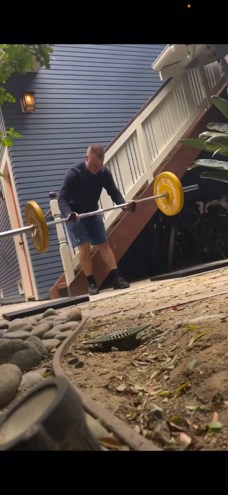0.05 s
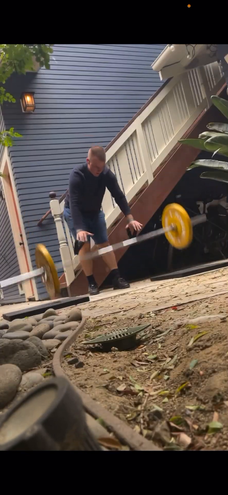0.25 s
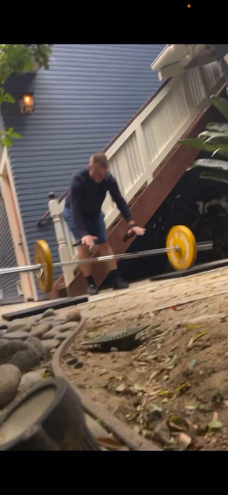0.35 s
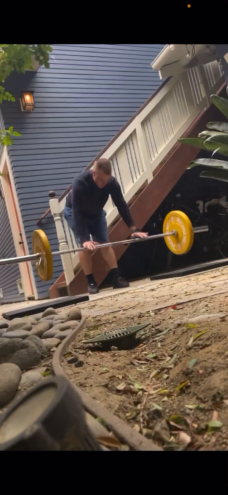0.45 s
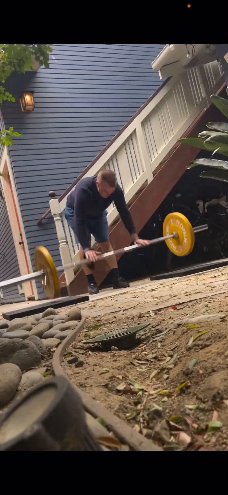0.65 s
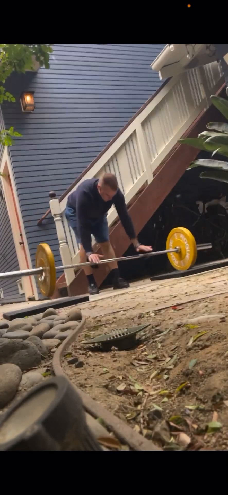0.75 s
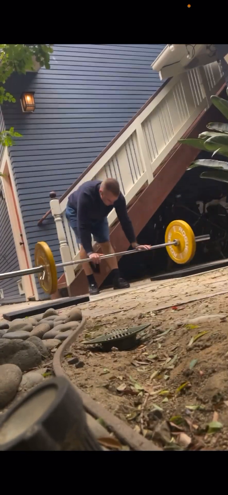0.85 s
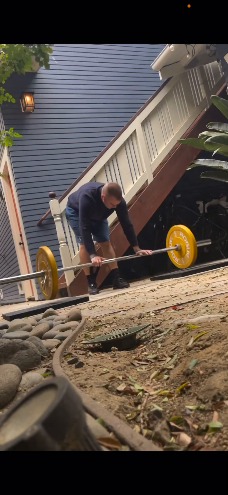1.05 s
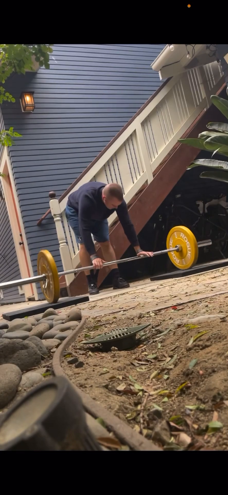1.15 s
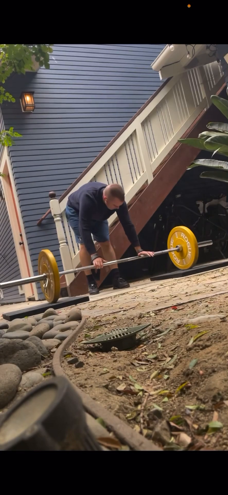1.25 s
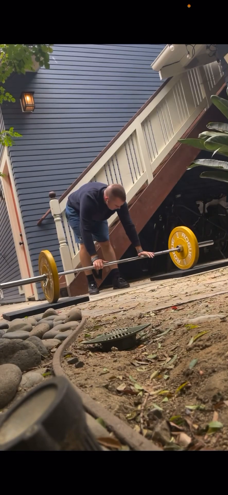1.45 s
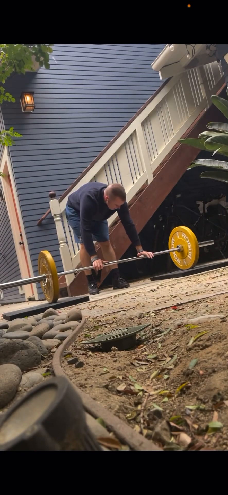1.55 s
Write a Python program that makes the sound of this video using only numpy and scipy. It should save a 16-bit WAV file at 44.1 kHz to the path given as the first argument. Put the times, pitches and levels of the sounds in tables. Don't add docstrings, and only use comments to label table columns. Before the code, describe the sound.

A loaded barbell drops on hard ground with a heavy thud, rattling through smaller bounces outdoors

```python
import sys
import numpy as np
from scipy import signal
from scipy.fft import rfft, irfft
from scipy.io import wavfile

SR = 44100
rng = np.random.default_rng(int(sys.argv[2]) if len(sys.argv) > 2 else 0)


def voltage_ratio(decibels):
    exponent = np.asarray(decibels, float) / 20
    return 10 ** exponent


def to_wav(s):
    ch = np.atleast_2d(s).T
    pcm = np.round(np.clip(ch, -1, 1) * 32767)
    wavfile.write(sys.argv[1], SR, pcm.astype(np.int16))


N = 70560

# frequency in Hz, density in dB per Hz.
YARD_SPECTRUM = [(15, -27.5), (25, -7), (65, 3.5), (431, -18.5), (477, -22.5), (1200, -36), (2610, -35),
                 (2880, -31.5), (9800, -66), (12700, -92), (21600, -120)]
# time in seconds, level in dB.
YARD_FADE = [(0, 6.5), (.09, -3.5), (0.202, -1), (1.301, 6), (1.6, -6.5)]
YARD_DB = -37.5
WHINE_HZ, WHINE_WIDTH_HZ, WHINE_DB = 679, 110, -21

# start in seconds, rms level in dB, hold in seconds,
# fade in dB per second, treble level in dB.
SHAKES = [(0, -61, .02, 87, 3), (0.253, -17.5, 0.036, 406, -0.5), (0.305, -17.5, .04, 154, -0.5),
          (.48, -37.5, 0.0094, 118.5, 0.5), (0.651, -25.5, 0.034, 270.5, -4),
          (0.689, -26, 0.091, 182.5, -1), (.932, -30.5, 0.045, 251, -3.5), (1.001, -32, 0.02, 271, -4),
          (1.064, -31, 0.014, 507, -9.5), (1.115, -29.5, 0.03, 287, -6.5), (1.161, -32.5, 0.013, 296, 0),
          (1.258, -37.5, 0.0066, 355, -7), (1.333, -39.5, 0.0067, 266, -3.5)]
# frequency in Hz, bandwidth in Hz, level in dB.
STEEL_MODES = [(1165, 127, 6), (1499, 20, 12.5), (1807, 34, 6.5), (2111, 32, 6.5), (2523, 55, -0.5),
               (2966, 78, -2), (3476, 20, 3), (3870, 74, 2.5), (4300, 36, -1.5), (5100, 27, 7),
               (5200, 73, -24.5), (5800, 18, -35), (6300, 92, -19), (7200, 390, -19.5)]
# frequency in Hz, density in dB per Hz.
CLATTER = [(350, -21.5), (600, -1.5), (1110, 0.5), (1660, -21.5), (1780, -2.5), (3230, -7.5), (5210, -5.5),
           (7850, -12.5), (9800, -26.5), (12700, -30.5), (21600, -120)]
# frequency in Hz, density in dB per Hz.
THUD = [(18, -40.5), (30, -3), (65, -1), (178, -9), (322, -15.5), (353, -12.5), (700, -24.5), (910, -31),
        (1540, -120)]
SHAKE_RISE_S, TREBLE_HZ = 0.003, 2880
KNOCKS_PER_S, KNOCK_SPREAD_DB = 400, 3.76
RING_DB, CHIP_DB, HISS_DB, THUD_DB = -2.5, -7.5, -2, 5.5
CHIP_WIDTH = 0.13

# start in seconds, level in dB, pitch in Hz.
BOOMS = [(.01, -48, 73), (0.058, -27.5, 72.8), (0.224, -26.5, 81), (.26, -7.5, 73.8), (.313, -5, 55.7),
         (0.355, -5, 61.8), (0.446, -14.5, 62), (.575, -26, 58), (0.653, -20, 63), (0.702, -21, 67.3),
         (.731, -10, 60.2), (0.768, -7.5, 61.8), (0.858, -18.5, 61.5), (0.928, -35.5, 62), (.995, -15, 61),
         (1.026, -15.5, 62), (1.121, -38, 56.4), (1.151, -20.5, 55), (1.186, -23, 58), (1.252, -23.5, 63.3),
         (1.318, -37, 61.2)]
BOOM_RISE_S, BOOM_FALL_S, BOOM_OVERTONE_DB = 0.007, 0.021, -13.5

# start in seconds, level of lower rings in dB, level of upper rings in dB.
CLINKS = [(.122, -46, -52), (.262, -12, -17), (.281, -11, -15), (.291, -13, -22), (.3155, -11, -9),
          (.322, -13, -22), (.333, -13, -20), (.348, -11, -22), (.379, -15, -24), (.485, -30, -26),
          (.515, -32, -29), (.59, -34, -36), (.661, -20, -24), (.693, -26, -21), (.704, -18, -17),
          (.732, -26, -21), (.756, -21, -20), (.769, -20, -30), (.779, -18, -25), (.795, -30, -24),
          (.915, -37, -36), (.937, -32, -22), (.947, -25, -28), (.96, -23, -19), (1.016, -36, -28),
          (1.133, -32, -26), (1.164, -26, -36), (1.293, -50, -40), (1.3278, -26, -26), (1.388, -44, -45)]
# frequency in Hz, bandwidth in Hz, level in dB.
COLLAR_MODES = [(2050, 500, -10), (3900, 500, -9), (5200, 450, 0), (6500, 700, -9), (7600, 550, 0),
                (8400, 700, -9)]
CLINK_S, CLINK_VARY_DB = 0.0012, 2.5
UPPER_HZ, UPPER_DB, LOWER_DB = 6000, -1, -1

# start in seconds, level in dB, pitch in Hz.
NEAR_LANDINGS = [
    (0.2472, 0, 388),
    (0.6449, -4.5, 370.4),
    (0.9196, -8.5, 370),
    (1.1058, -12, 360),
]
# start in seconds, level in dB, pitch in Hz.
FAR_LANDINGS = [(.306, -1, 320), (.318, -7.5, 310), (.327, -9, 446), (.338, -8.5, 330), (0.345, -19.5, 348),
                (0.722, -10.5, 333), (.735, -14, 310), (0.955, -14, 288), (.978, -10, 335),
                (0.991, -12, 310), (0.9266, -15, 326), (1.112, -14, 262), (1.123, -19, 236),
                (1.136, -18, 234), (1.151, -20, 278), (1.2347, -15.5, 311), (1.244, -23, 258),
                (1.251, -20.5, 217), (1.29, -27, 270), (1.349, -24.5, 241)]
NEAR_RISE_S, NEAR_LOW, NEAR_GLIDE = 0.0026, 0.5, 1.4
FAR_RISE_S, FAR_LOW, FAR_GLIDE = 0.0031, 0.768, 0.5
GLIDE_S = 0.0032
TICK_RISE_S, TICK_S, TICK_DB = 0.00089, 0.0038, -28.5

# frequency in Hz, time to decay 60 dB in seconds.
WALLS = [(60, .3), (300, 0.47), (1500, 0.36), (5000, 0.45), (9000, 0.33)]
WALL_DB = -11.5

BASS_CUT_HZ, LIMIT, EDGE_HZ = 38, 1.04, 9800


def evened(x):
    return x / np.sqrt(np.mean(x ** 2) + 1e-20)


def read(points, hz):
    f, value = np.transpose(points)
    return np.interp(np.log(hz + 1), np.log(f + 1), value)


def add(mix, s, sound):
    part = mix[max(round(s * SR), 0):][:len(sound)]
    part += sound[:len(part)]


def colour(x, points):
    hz = np.fft.rfftfreq(len(x), 1 / SR)
    inside = (hz > 0.7 * points[0][0]) & (hz < 1.3 * points[-1][0])
    return evened(irfft(rfft(x) * voltage_ratio(read(points, hz)) * inside, len(x)))


def resonate(x, hz, width):
    r = np.exp(-np.pi * width / SR)
    return signal.lfilter([1 - r, 0, r - 1], [1, -2 * r * np.cos(2 * np.pi * hz / SR), r * r], x)


def swell(t, rise, fall):
    shape = (1 - np.exp(-t / rise)) ** 2 * np.exp(-t / fall)
    return shape / shape.max()


def yard():
    s, db = np.transpose(YARD_FADE)
    level = voltage_ratio(YARD_DB + np.interp(np.arange(N) / SR, s, db))
    rumble = colour(rng.standard_normal(N), YARD_SPECTRUM)
    whine = evened(resonate(rng.standard_normal(N), WHINE_HZ, WHINE_WIDTH_HZ))
    return level * (rumble + voltage_ratio(WHINE_DB) * whine)


def knocks():
    size = voltage_ratio(KNOCK_SPREAD_DB * np.minimum(rng.exponential(1, N), 3))
    struck = rng.random(N) < KNOCKS_PER_S / SR
    return evened(size * struck * rng.choice([-1., 1.], N))


def shake_power():
    t, low, high = np.arange(N) / SR, np.zeros(N), np.zeros(N)
    for s, db, hold, fade_db, treble_db in SHAKES:
        u = np.maximum(t - s, 0)
        rise = np.minimum(u / SHAKE_RISE_S, 1)
        power = (rise * voltage_ratio(db - fade_db * np.maximum(u - hold, 0))) ** 2
        low += power
        high += power * voltage_ratio(2 * treble_db)
    return low, high


def rattle():
    low, high = shake_power()
    ring, chips = np.zeros(N), np.zeros(N)
    for hz, width, db in STEEL_MODES:
        train = knocks()
        ring += voltage_ratio(db) * resonate(train, hz, width)
        chip = resonate(resonate(train, hz, CHIP_WIDTH * hz), hz, 2 * CHIP_WIDTH * hz)
        chips += voltage_ratio(read(CLATTER, hz)) * chip
    hiss = colour(rng.standard_normal(N), CLATTER)
    steel = voltage_ratio(RING_DB) * evened(ring) + voltage_ratio(CHIP_DB) * evened(chips) + voltage_ratio(HISS_DB) * hiss
    dull = signal.sosfiltfilt(signal.butter(2, TREBLE_HZ, fs=SR, output="sos"), steel)
    thud = colour(rng.standard_normal(N), THUD)
    return np.sqrt(low) * (dull + voltage_ratio(THUD_DB) * thud) + np.sqrt(high) * (steel - dull)


def ground():
    out, t = np.zeros(N), np.arange(0, 0.4, 1 / SR)
    for s, db, hz in BOOMS:
        phase = 2 * np.pi * hz * t
        tone = np.sin(phase) + voltage_ratio(BOOM_OVERTONE_DB) * np.sin(1.9 * phase)
        add(out, s, voltage_ratio(db) * swell(t, BOOM_RISE_S, BOOM_FALL_S) * tone)
    return out


def collars():
    out, t = np.zeros(N), np.arange(900) / SR
    puffs = rng.standard_normal((len(CLINKS), 900)) * np.exp(-t / CLINK_S)
    vary = rng.standard_normal((len(CLINKS), len(COLLAR_MODES)))
    for (s, lower_db, upper_db), puff, offsets in zip(CLINKS, puffs, vary):
        for (hz, width, mode_db), offset in zip(COLLAR_MODES, offsets):
            ring = resonate(resonate(puff, hz, width), hz, 2 * width)
            part_db = upper_db + UPPER_DB if hz > UPPER_HZ else lower_db + LOWER_DB
            level = voltage_ratio(mode_db + CLINK_VARY_DB * offset + part_db)
            add(out, s, level * ring / abs(ring).max())
    return out


def slap(db, hz, rise, low, glide):
    t = np.arange(0, 0.04, 1 / SR)
    turns = np.cumsum(hz * (low + glide * np.exp(-t / GLIDE_S))) / SR
    pulse = (t / rise * np.exp(1 - t / rise)) ** 2
    return voltage_ratio(db) * pulse * np.sin(2 * np.pi * turns)


def plates():
    out, t = np.zeros(N), np.arange(800) / SR
    for s, db, hz in NEAR_LANDINGS:
        add(out, s, slap(db, hz, NEAR_RISE_S, NEAR_LOW, NEAR_GLIDE))
        grit = rng.standard_normal(800)
        add(out, s, voltage_ratio(db + TICK_DB) * grit * swell(t, TICK_RISE_S, TICK_S))
    for s, db, hz in FAR_LANDINGS:
        add(out, s, slap(db, hz, FAR_RISE_S, FAR_LOW, FAR_GLIDE))
    return out


def walls(x):
    taps = np.zeros(SR // 2)
    at = np.arange(400, SR // 2 - 20, 20)
    taps[at + rng.integers(0, 20, len(at))] = rng.choice([-1., 1.], len(at))
    hz, t, z = signal.stft(taps, SR, nperseg=512)
    decay = voltage_ratio(-60 * t / read(WALLS, hz)[:, None])
    tail = signal.istft(z * decay, SR, nperseg=512)[1]
    return signal.fftconvolve(x, tail / np.linalg.norm(tail))[:N]


def scene():
    bar = plates() + rattle() + collars()
    return (bar + voltage_ratio(WALL_DB) * walls(bar) + ground() + yard())[None]


def band_limit(x):
    return signal.sosfilt(signal.butter(12, 9950, fs=SR, output="sos"), x)


def record(dry):
    x = signal.sosfilt(signal.butter(2, BASS_CUT_HZ, "high", fs=SR, output="sos"), dry)
    x = x / (1 + abs(x / LIMIT) ** 6) ** (1 / 6)
    lowpass = signal.firwin(301, EDGE_HZ, window=("kaiser", 9), fs=SR)
    x = signal.oaconvolve(x, lowpass[None], "same")
    return band_limit(x)


dry = scene()
out = record(dry)
to_wav(out)
```